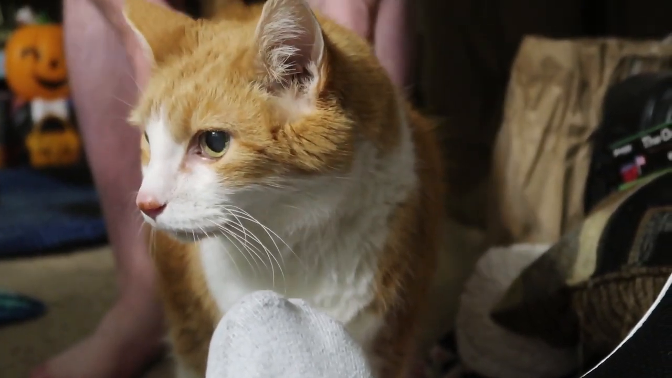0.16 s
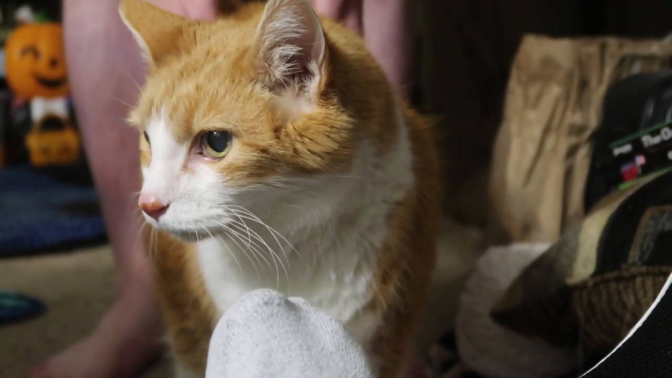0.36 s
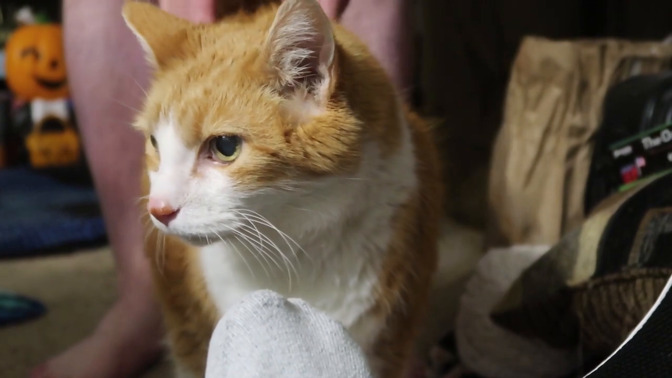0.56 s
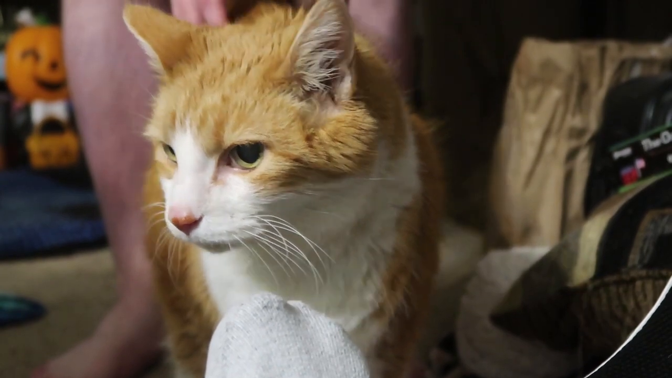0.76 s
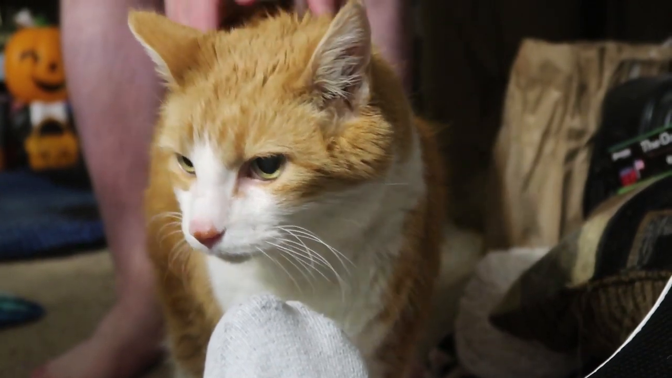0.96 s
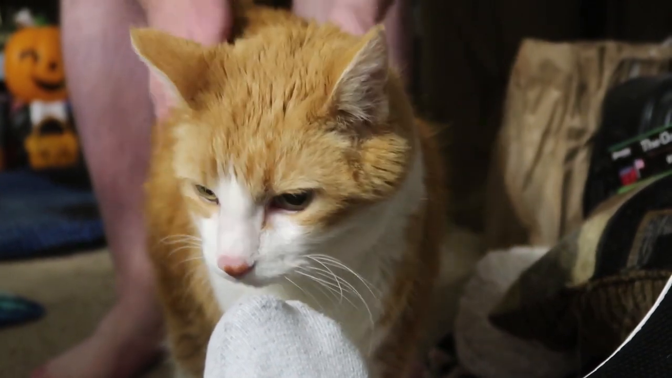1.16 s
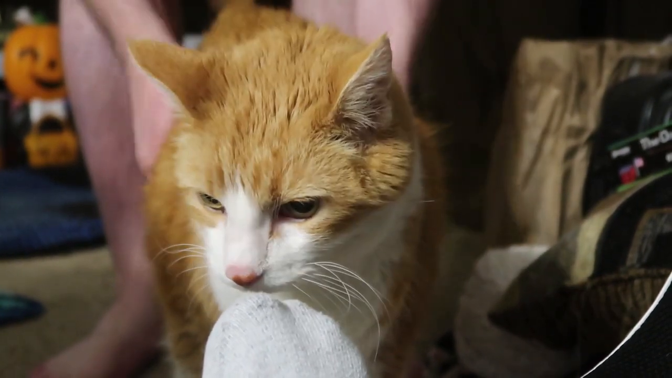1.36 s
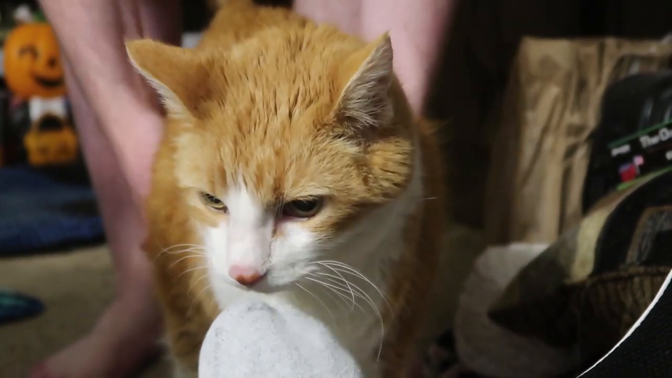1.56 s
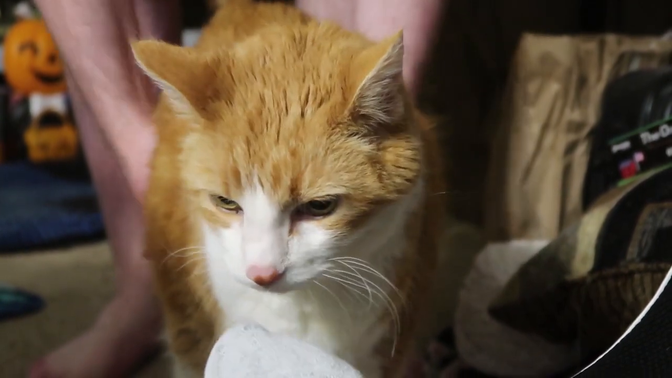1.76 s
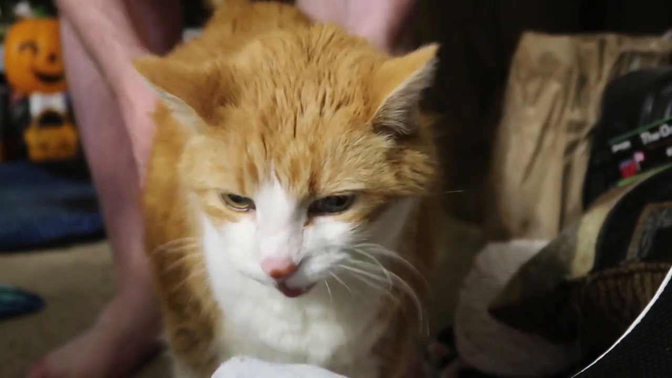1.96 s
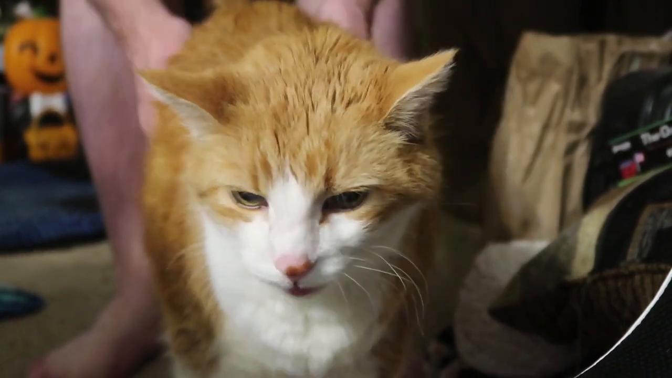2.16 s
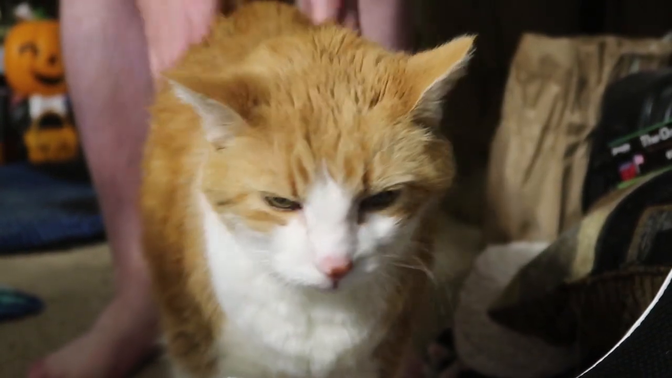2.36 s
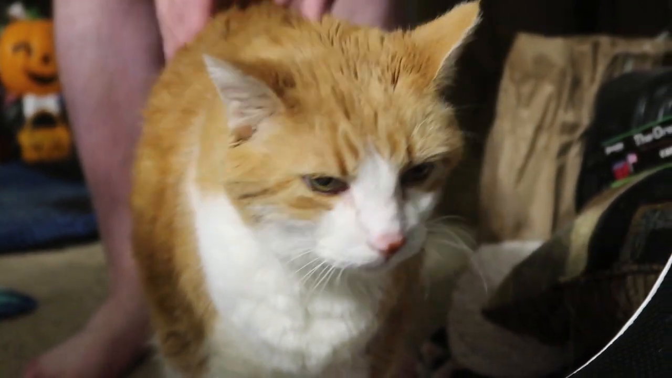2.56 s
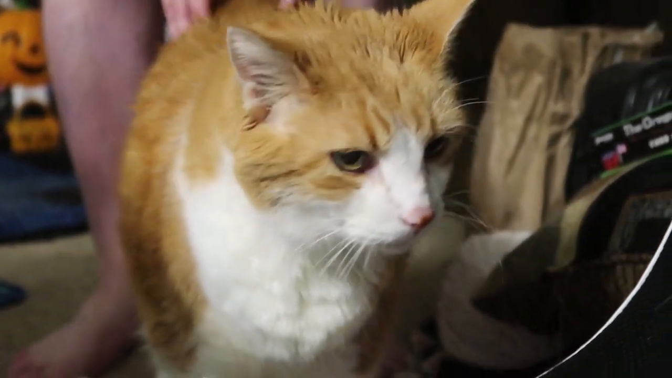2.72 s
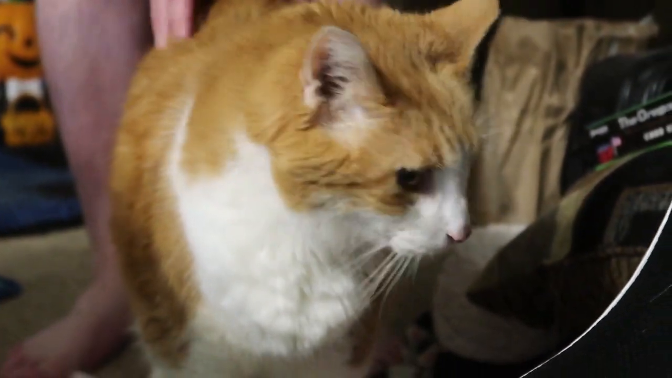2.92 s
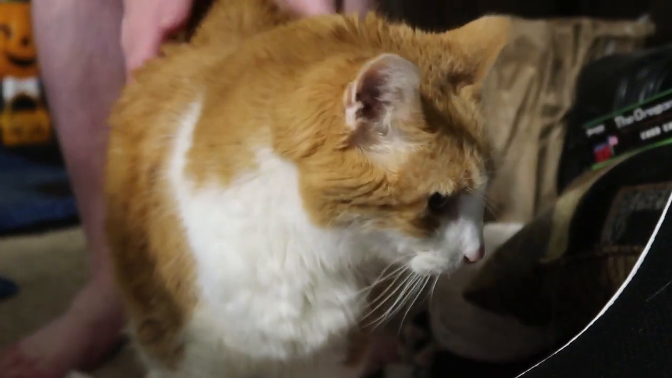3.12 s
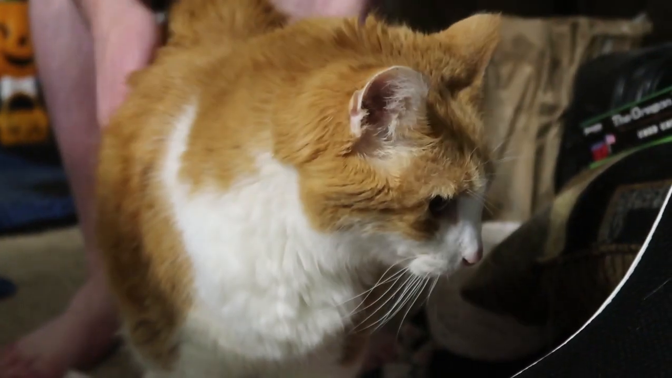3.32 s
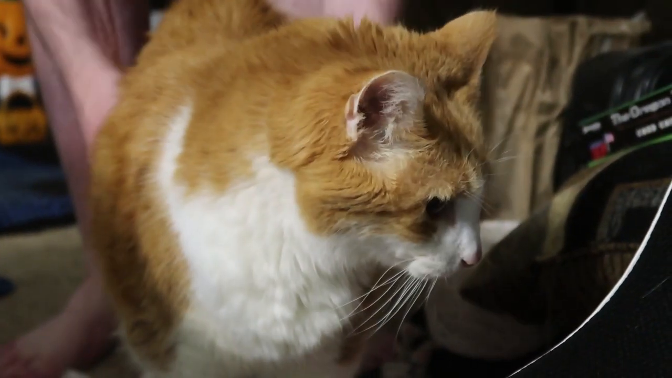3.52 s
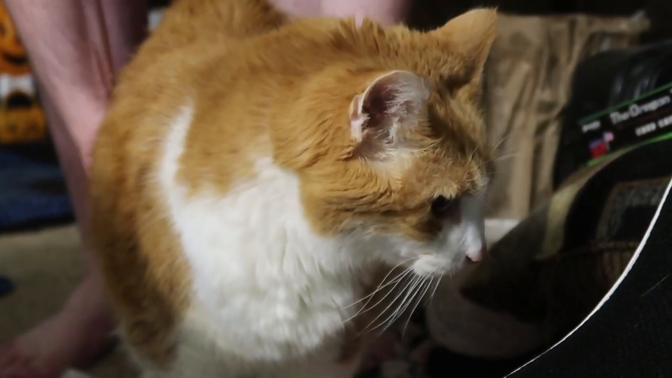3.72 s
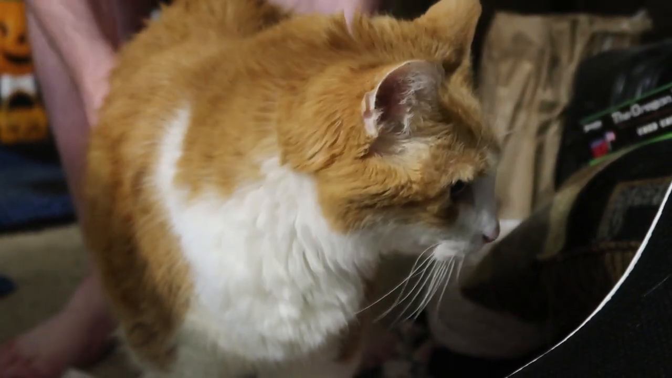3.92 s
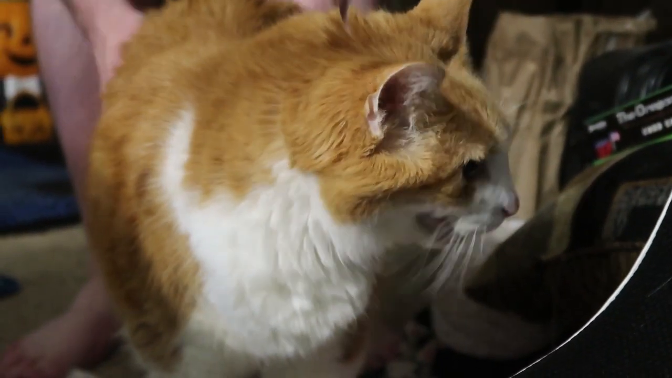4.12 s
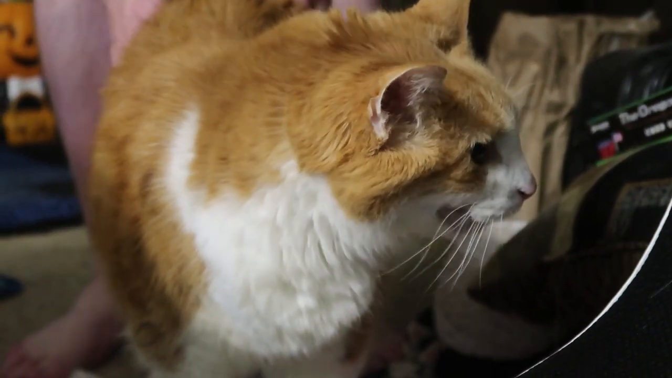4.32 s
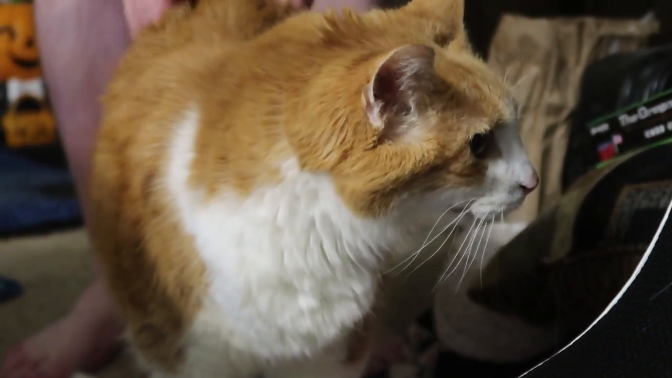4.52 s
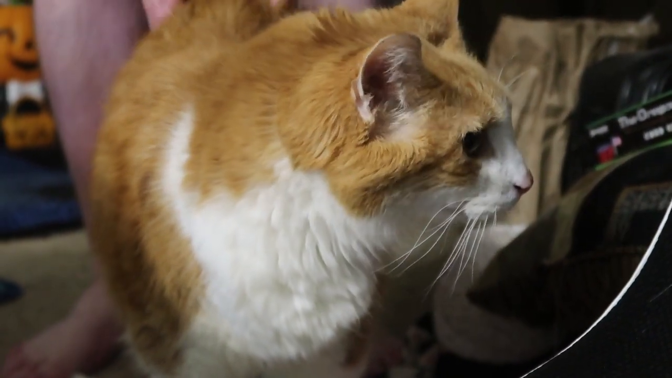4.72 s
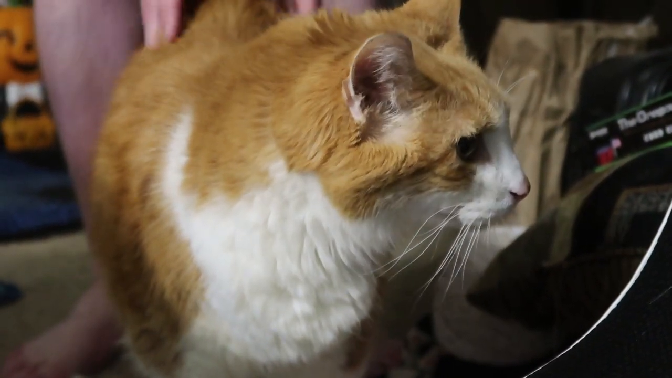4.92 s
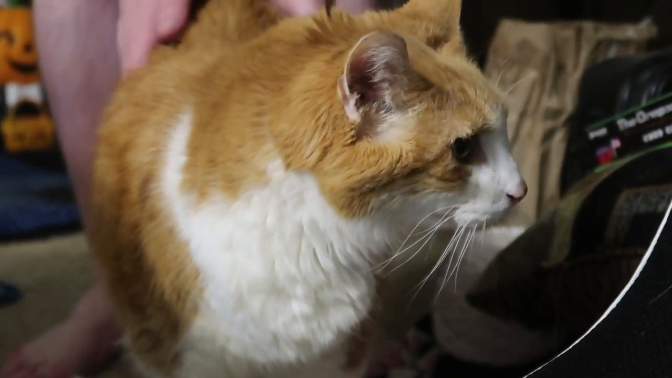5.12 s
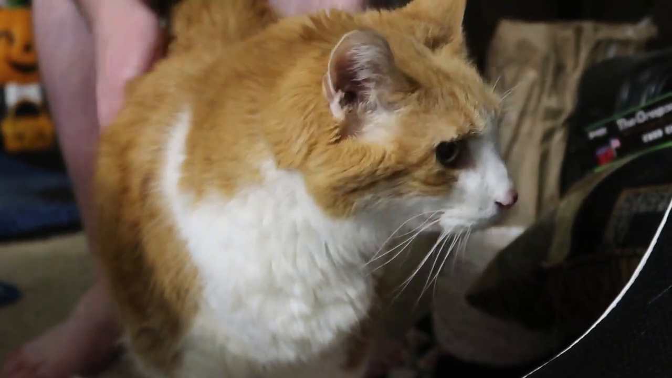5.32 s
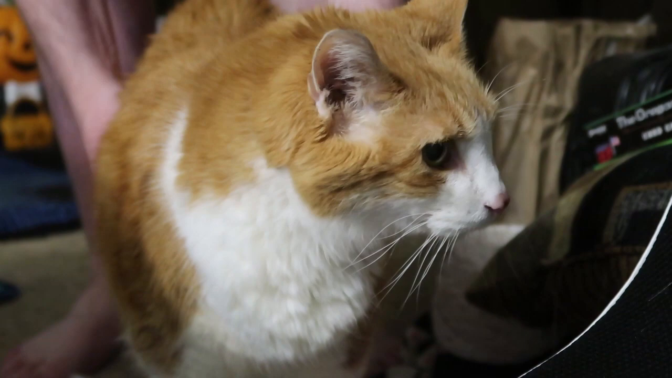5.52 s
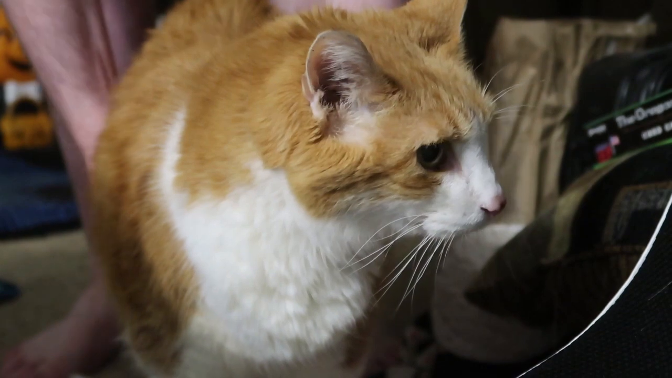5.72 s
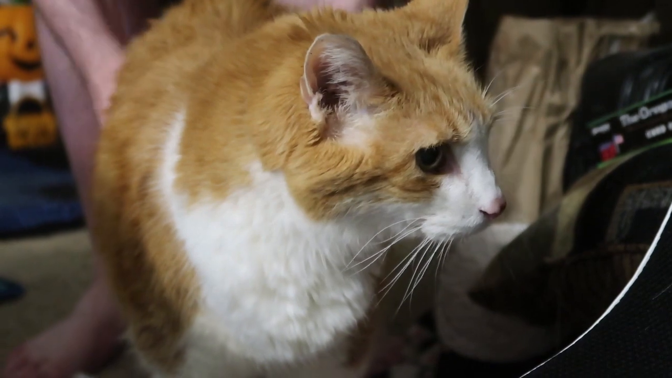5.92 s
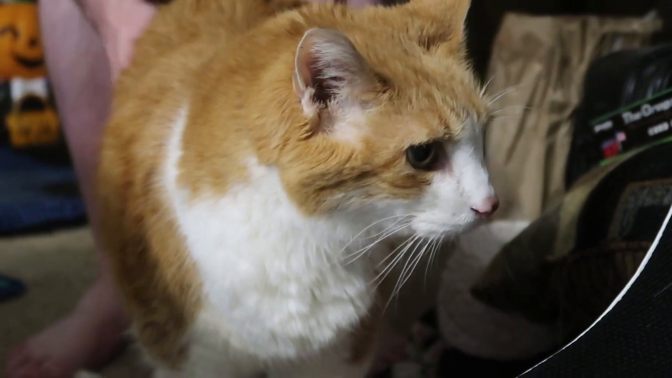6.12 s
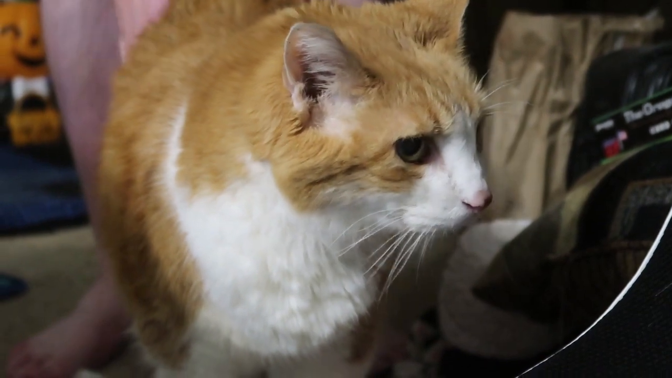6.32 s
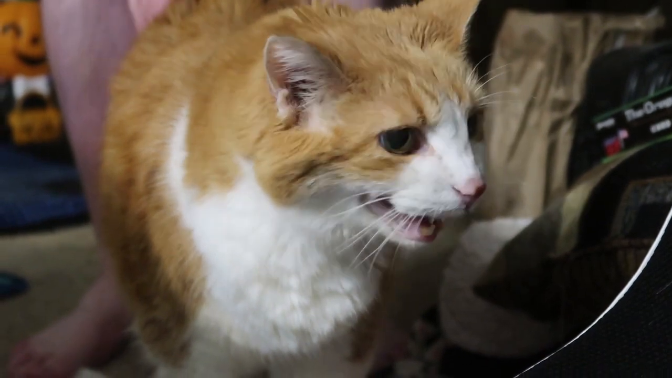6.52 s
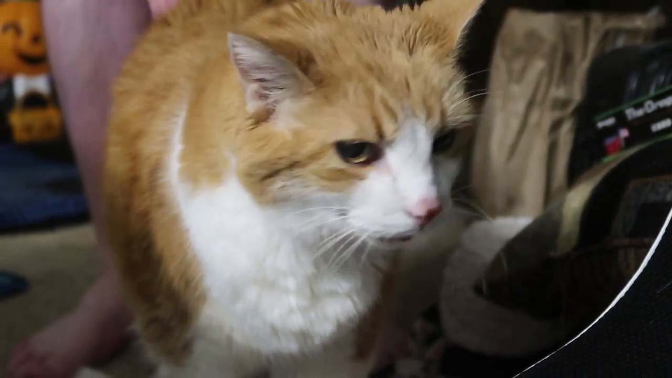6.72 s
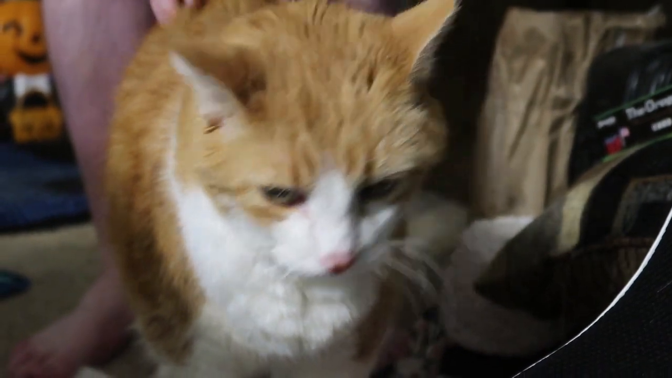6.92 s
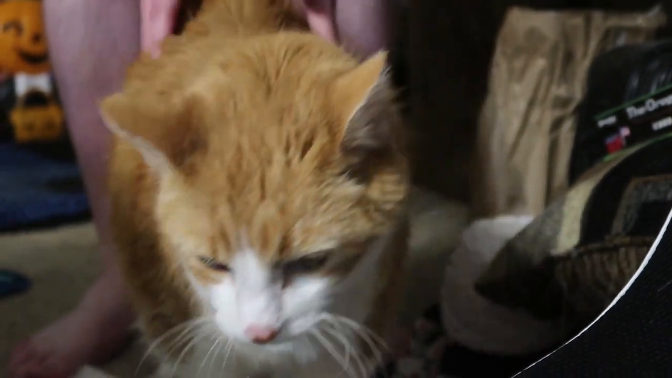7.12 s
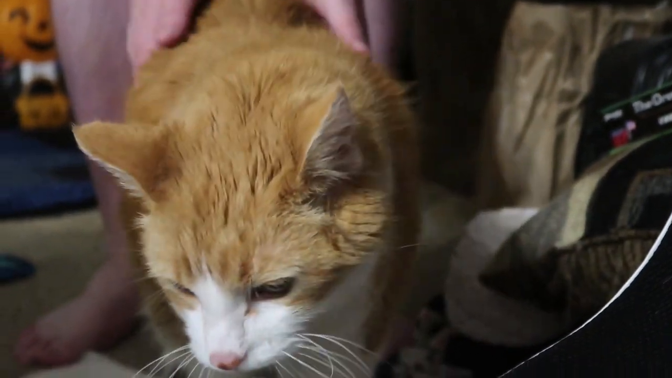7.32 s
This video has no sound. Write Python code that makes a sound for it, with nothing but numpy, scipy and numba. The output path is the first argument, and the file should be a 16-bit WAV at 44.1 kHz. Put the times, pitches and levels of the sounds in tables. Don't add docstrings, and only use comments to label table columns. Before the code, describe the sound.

A house cat meows three times at close range in a quiet carpeted room, each cry opening from a throaty trill, over faint hum and hiss.

```python
import sys
import numpy as np
from scipy import signal
from scipy.fft import rfft, irfft, next_fast_len
from scipy.io import wavfile
from scipy.ndimage import uniform_filter1d, map_coordinates
from numba import njit

SR = 44100
rng = np.random.default_rng(int(sys.argv[2]) if len(sys.argv) > 2 else 0)


def boost_factor(decibels):
    exponent = np.asarray(decibels, float) / 20
    return 10 ** exponent


def unload_wav(signal):
    wavfile.write(
        sys.argv[1],
        SR,
        np.round(np.clip(np.atleast_2d(signal).T, -1, 1) * 32767).astype(np.int16),
    )


N = 329427
TIME = np.arange(N) / SR

# (frequency [Hz], level [dB])
HUM_TONES = [(59.2, -4), (118.4, -2), (178, -11), (360.7, -10.5)]
# (time [s], level [dB], extra level of the lowest tone [dB])
HUM_SWELLS = [(.6, -51.5, 1.5), (1.35, -56, 2.5), (1.85, -58, 6), (2.2, -57, -6), (2.9, -56.5, -8),
              (3.65, -56, 4), (4.05, -61, 5), (4.6, -55, -1.5), (5.2, -56.5, -14), (5.8, -57.5, 3),
              (6.25, -55.5, 1), (7.1, -52.5, -7)]
HUM_SWELL_S, HUM_REST_DB = 0.27, -75
# (frequency [Hz], level per Hz [dB])
AIR_SAME = [(2.4, -53.5), (4.0, -25.5), (16, -20), (27, -11), (47, -7.5), (87, -2), (123, -4.5), (211, -10),
            (351, -10.5), (388, -12.5), (460, -12), (545, -16), (6050, -31), (11500, -43), (13200, -53.5)]
# (frequency [Hz], level per Hz [dB])
AIR_DIFFERENT = [(8.8, -74.5), (15, -38), (43, -16.5), (119, -3), (295, 1), (451, -0.5), (505, -2.5),
                 (566, -6.5), (970, -7), (5960, -22.5), (11100, -32.5), (12100, -39.5), (13200, -14)]
# (time [s], level [dB])
NOSE_WHISTLE = [
    (.35, -76),
    (.5, -71.5),
    (1, -75),
    (1.2, -88),
]

# (time [s], chest peak [dB], pitch [Hz], throat opening [0-1])
TRILL_BURSTS = [(1.927, -40.5, 229, 0.75), (1.937, -38, 151, 0.18), (1.947, -45, 202.7, 0.94),
                (3.985, -49, 130.8, .05), (4.011, -51, 139.2, .15), (4.068, -38.5, 203.4, 0.15),
                (4.096, -35.5, 194.2, 0.2), (4.123, -33.5, 198.6, 0.25), (4.154, -34, 206, 0.4),
                (6.179, -51.5, 142.4, 0.07), (6.221, -37, 155, .1), (6.283, -41.5, 212.1, 0.24),
                (6.311, -33.5, 175.6, 0.02), (6.332, -37.5, 177.8, 0.54), (6.362, -36, 180, 0.57),
                (6.393, -33.5, 152.4, 0.42), (6.42, -35.5, 171, 0.71), (6.445, -39, 192.7, 0.77)]
# (frequency [Hz], width [Hz], level [dB])
SHUT_THROAT_MODES = [(767, 234, 3.5), (1287, 235, -3)]
# (frequency [Hz], width [Hz], level [dB])
SHUT_NOSE_MODES = [(2300, 200, 0), (4000, 440, -5.5), (5730, 260, -13)]
BURST_OVERLAP_S, BURST_LONGEST_S = 0.0062, 0.033
THROAT_SHUT_DB, THROAT_OPENS_DB, NOSE_OPENS_DB = -16.5, 20.5, 26

# (time [s], pitch [Hz], level [dB], mouth resonance [Hz], effort [0-1])
FIRST_MEOW = [
    (1.972, 249.5, -55, 1580, 0.46),
    (2.004, 225.7, -34, 1660, 0.6),
    (2.026, 228.8, -37.5, 2000, 0.98),
    (2.065, 245.1, -35.5, 2100, 0.98),
    (2.18, 243, -34.5, 2057, 1),
    (2.343, 227.1, -32, 1672, 0.55),
    (2.45, 216, -34, 1507, 0.42),
    (2.527, 199.8, -40, 1315, 0.45),
    (2.575, 161, -66, 1340, 0.7),
]
# (time [s], pitch [Hz], level [dB], mouth resonance [Hz], effort [0-1])
SECOND_MEOW = [
    (4.272, 262.5, -40, 2300, 0.67),
    (4.298, 234.1, -34.5, 2320, 0.7),
    (4.342, 235.2, -36, 2300, 0.65),
    (4.384, 223.1, -35, 2190, 0.67),
    (4.486, 218.9, -33.5, 1690, 0.27),
    (4.5, 216.5, -38.5, 1700, 0.43),
    (4.603, 203.7, -39.5, 1483, .2),
    (4.67, 192.9, -41, 1368, .05),
    (4.74, 186.4, -63, 1310, .2),
]
# (time [s], pitch [Hz], level [dB], mouth resonance [Hz], effort [0-1])
THIRD_MEOW = [
    (6.531, 280, -37.5, 2220, 0.62),
    (6.555, 241.2, -35.5, 2300, 0.81),
    (6.59, 232, -35.5, 2310, 0.87),
    (6.63, 235.6, -35.5, 2110, 0.93),
    (6.7, 230.7, -38, 1960, 0.83),
    (6.779, 228.5, -39, 1724, 0.36),
    (6.872, 223.6, -43.5, 1478, 0.052),
    (6.92, 183, -51.5, 1366, .3),
    (6.94, 177, -92, 1390, 0.44),
]
# (time [s], pitch [Hz], level [dB], mouth resonance [Hz], effort [0-1])
LEAD_IN_WHINES = [
    [(4.172, 259, -54.5, 1347, .4), (4.194, 268, -40, 1360, 0.36), (4.213, 259, -45.5, 1400, 0.46),
     (4.228, 266.1, -40, 1840, .6), (4.245, 268, -45.5, 2330, 0.41), (4.264, 267, -47, 2310, 0.76)],
    [(6.462, 226, -58, 1200, 0.63), (6.474, 239, -50, 1350, 0.75), (6.503, 270, -53, 2040, 0.85),
     (6.522, 289, -51.5, 2352, 0.78)],
]
# (lips part [s], mouth over throat [dB], tongue under mouth [dB], teeth [dB],
# trill nasality [dB])
FACE = [
    (2.007, 7.5, -17, -7, -43),
    (4.268, 8.5, -13, -3.5, -21.5),
    (6.525, 5.5, -18.5, -6.5, -18),
]
# (palate [Hz], gums [Hz], teeth [Hz], lips [Hz], teeth loss with shut lips [dB])
UPPER_MODES = [
    (3384, 4320, 5130, 5950, 12),
    (3800, 4550, 5050, 5760, 5),
    (3614, 4415, 5420, 6140, 16),
]
# (level [dB], loss at full effort [dB], gulp as the jaw shuts [dB],
# second harmonic [dB])
CHEST_TONE = [
    (-38.5, 16, 18.5, -43.5),
    (-42, 5.5, 8, -46),
    (-51, -0.5, 12.5, -46.5),
]
HOARSENESS = [
    0.023,
    0.11,
    0.28,
]
# (time [s], half length [s], added roughness [0-1])
VOICE_BREAKS = [(2.02, 0.0086, 0.21), (2.325, 0.029, 0.093), (4.28, 0.017, 0.68), (4.352, 0.014, 0.3),
                (4.453, 0.0031, 0.074), (4.497, 0.005, 0.25), (6.543, 0.013, 0.72), (6.58, 0.0074, 0.38),
                (6.627, 0.0068, 0.4), (6.654, 0.0076, 0.43)]
CLOSING_HZ, CLOSING_SPAN_HZ = 1724, 410
WHINE_SHUT = 0.45
MOUTH_SHUT_DB, TONGUE_SHUT_DB, PALATE_SHUT_DB, GUMS_SHUT_DB, LIPS_SHUT_DB = 11, 22.5, 6, 8.5, 12
MOUTH_SLACK_DB, PALATE_SLACK_DB, TEETH_SLACK_DB, TEETH_WHINE_DB = 3, 37, 11.5, 9.5
TONGUE_RATIO = 1.465
SPREAD_S, SPREAD_RISE, SPREAD_DB, SHUT_SAG = 0.054, 0.059, 8.5, 0.15
GUMS_DB, GUMS_FRESH_DB, MOUTH_FRESH_DB = 0.5, 7.5, 2.5
ROUGH_DB, ROUGH_SPAN_DB, ONSET_ROUGH, ONSET_S = -37.5, 22, .4, .025
DRIFT, ROUGH_DRIFT = .012, .03
CHEST_KNEE_DB, CHEST_FADE, GULP_BEFORE_S, GULP_S = -40, 0.52, 0.019, .015
NOSE_NOTCH_HZ, NOTCH_WIDTH_HZ, NOTCH_DB = 444.7, 12, 19

# (time [s], left over right [dB])
TREBLE_LEAN = [
    (2.3, -1.3),
    (4.4, -1.5),
    (6.7, -1.5),
]
# (delay [s], left level [dB], right level [dB])
NEAR_ECHOES = [(.0019, -29.5, -14.5), (.0027, -31.5, -22), (.0044, -28, -30.5), (.0071, -15, -23.5)]
# (frequency [Hz], time to drop 60 dB [s])
ROOM_DECAY = [(150, 0.33), (1500, 0.51), (7000, 0.11)]


def unit(x):
    return x / np.sqrt(np.mean(x ** 2) + 1e-20)


def steady(x):
    power = uniform_filter1d(uniform_filter1d(x * x, size=600), size=600)
    return x / np.sqrt(np.abs(power) + 1e-12)


def along(points, hz):
    f, v = np.transpose(points)
    return np.interp(np.log(hz + 1), np.log(f + 1), v)


def columns(rows):
    s, *cols = np.transpose(rows)
    return [np.interp(TIME, s, c) for c in cols]


def wobble(rate):
    return map_coordinates(rng.standard_normal(int(N * rate / SR) + 4), [TIME * rate])


def coloured(spectrum):
    m = next_fast_len(N + 8192)
    white = rfft(rng.standard_normal(m))
    gain = boost_factor(along(spectrum, np.fft.rfftfreq(m, 1 / SR)))
    return unit(irfft(white * gain, m)[:N])


def high_pass(x, order, hz):
    return signal.sosfilt(signal.butter(order, hz, "high", fs=SR, output="sos"), x)


@njit
def resonate(x, hz, width, sr):
    y = np.zeros(len(x))
    for i in range(2, len(x)):
        r = np.exp(-np.pi * width[i] / sr)
        turn = 2 * r * np.cos(2 * np.pi * hz[i] / sr)
        y[i] = (1 - r) * (x[i] - x[i - 2]) + turn * y[i - 1] - r * r * y[i - 2]
    return y


def ring(x, hz, width):
    return resonate(x, hz + np.zeros(N), width + np.zeros(N), float(SR))


def hum():
    total = np.zeros(N)
    for k, (hz, db) in enumerate(HUM_TONES):
        swell = boost_factor(HUM_REST_DB)
        for s, swell_db, low_db in HUM_SWELLS:
            peak = boost_factor(swell_db + (k == 0) * low_db)
            swell = swell + peak * np.exp(-((TIME - s) / HUM_SWELL_S) ** 2)
        level = swell * boost_factor(db + 2.0 * wobble(3.12))
        total += level * np.sin(2 * np.pi * hz * TIME + 0.3 * wobble(1.9))
    return total


def air():
    same = boost_factor(-55.0) * coloured(AIR_SAME)
    different = boost_factor(-55.5) * coloured(AIR_DIFFERENT)
    return np.array([same + different, same - different])


def wheeze():
    level, = columns(NOSE_WHISTLE)
    flutter_db = 1.5 * wobble(11.5)
    whistle = ring(ring(rng.standard_normal(N), 2770, 180), 3200, 300)
    return boost_factor(level + flutter_db) * (TIME < 1.3) * unit(whistle)


def meow_now():
    parts = np.transpose(FACE)[0]
    which = np.searchsorted((parts[1:] + parts[:-1]) / 2, TIME)
    return which, TIME - parts[which]


def folds(pitch_hz, rough, jitter, shimmer_db, breath):
    phase = np.cumsum(pitch_hz * (1 + .004 * wobble(40) + jitter * rough * wobble(160))) / SR
    at = np.interp(np.arange(1, int(phase[-1])), phase, np.arange(N))
    size_db = (0.33 + shimmer_db * rough[at.astype(int)]) * rng.standard_normal(4000)[:len(at)]
    taps = at.astype(int)[:, None] + np.arange(-4, 6)
    shape = boost_factor(size_db)[:, None] * np.exp(-.5 * (taps - at[:, None]) ** 2)
    pulses = np.bincount(taps.ravel(), shape.ravel(), N + 8)[:N]
    puff = (1 - phase % 1) ** 2 * rng.standard_normal(N)
    return phase, -pulses + breath * (0.011 + rough) * puff, puff


def shut_cavity(source, modes):
    total = np.zeros(N)
    for k, (hz, width, db) in enumerate(modes):
        total += (-1) ** k * boost_factor(db) * ring(ring(source, hz, width), hz, 3 * width)
    return unit(total)


def trill():
    s, chest_db, hz, opening = np.transpose(TRILL_BURSTS)
    length = (np.diff(s, append=N / SR) + BURST_OVERLAP_S).clip(None, BURST_LONGEST_S)
    throat_db = THROAT_SHUT_DB + THROAT_OPENS_DB * opening
    nasality_db = np.transpose(FACE)[-1][meow_now()[0][(s * SR).astype(int)]]
    nose_db = nasality_db + NOSE_OPENS_DB * (opening - .5)
    pitch = np.interp(TIME, s, hz)
    phase, source, _ = folds(pitch, np.full(N, .8), jitter=0.17, shimmer_db=2.0, breath=.6)
    swell = np.zeros((3, N))
    for k in range(len(s)):
        u = np.arange(int(length[k] * SR)) / (length[k] * SR)
        gains = boost_factor(chest_db[k] + np.array([0, throat_db[k], nose_db[k]]))
        arch = np.sin(np.pi * u ** 0.76) ** [[1.], [.7], [1.5]]
        swell[:, int((s[k] - .003) * SR):][:, :len(u)] += gains[:, None] * arch
    throat = shut_cavity(source, SHUT_THROAT_MODES)
    nose = shut_cavity(source, SHUT_NOSE_MODES)
    chest = np.sin(2 * np.pi * phase) + boost_factor(-9.0) * np.sin(4 * np.pi * phase + 0.75)
    return swell[0] * boost_factor(-4.0) * chest + swell[1] * boost_factor(-4.5) * throat + swell[2] * boost_factor(-4.0) * nose


def chest_tone(phase, pitch, level, press, which):
    chest_db, loss_db, gulp_db, second_db = np.transpose(CHEST_TONE)[:, which]
    ends = np.array([FIRST_MEOW[-1][0], SECOND_MEOW[-1][0], THIRD_MEOW[-1][0]])[which]
    gulp = np.exp(-((TIME - ends + GULP_BEFORE_S) / GULP_S) ** 2)
    chest_db = chest_db - loss_db * press ** 2 + gulp_db * gulp
    second_db = second_db - NOTCH_DB * np.exp(-((2 * pitch - NOSE_NOTCH_HZ) / NOTCH_WIDTH_HZ) ** 2)
    fade_db = CHEST_FADE * (level - CHEST_KNEE_DB).clip(None, 0)
    first = boost_factor(chest_db + 1.0) * np.sin(2 * np.pi * phase - 1.2)
    second = boost_factor(second_db) * np.sin(4 * np.pi * phase - .7)
    return boost_factor(fade_db) * (first + second)


def cries():
    calls = [FIRST_MEOW, LEAD_IN_WHINES[0], SECOND_MEOW, LEAD_IN_WHINES[1], THIRD_MEOW]
    pitch, level, mouth_hz, press = columns(np.concatenate(calls))
    which, since = meow_now()
    level = uniform_filter1d(level, size=200)
    mouth_hz = uniform_filter1d(mouth_hz, size=600)

    closing = ((CLOSING_HZ - mouth_hz) / CLOSING_SPAN_HZ).clip(0, 1)
    whining = since < 0
    shut = np.maximum(closing, WHINE_SHUT * whining)
    slack = 1 - press.clip(0, 1)
    spread = np.exp(-since.clip(0) / SPREAD_S)
    _, mouth_db, tongue_db, top_db, _ = np.transpose(FACE)[:, which]
    palate_hz, gums_hz, teeth_hz, lips_hz, teeth_shut_db = np.transpose(UPPER_MODES)[:, which]
    mouth_db = mouth_db - MOUTH_SHUT_DB * shut - MOUTH_SLACK_DB * slack - MOUTH_FRESH_DB * spread
    palate_db = -PALATE_SLACK_DB * slack - PALATE_SHUT_DB * shut
    top_db = top_db - teeth_shut_db * shut - TEETH_SLACK_DB * slack - TEETH_WHINE_DB * whining
    gliding = [pitch, mouth_db, palate_db, top_db]
    pitch, mouth_db, palate_db, top_db = uniform_filter1d(gliding, size=500, axis=1)
    effort = ((level + mouth_db + 44.0) / 18).clip(0, 1)
    stretch = (1 - SPREAD_RISE * spread) * (1 - SHUT_SAG * closing)
    teeth_hz, lips_hz = teeth_hz * stretch, lips_hz * stretch
    tongue_hz = TONGUE_RATIO * mouth_hz
    tongue_db = tongue_db - TONGUE_SHUT_DB * shut - 4.3 * (0.5 - effort)
    gums_db = GUMS_DB + GUMS_FRESH_DB * spread - GUMS_SHUT_DB * closing
    lips_db = -SPREAD_DB * spread - LIPS_SHUT_DB * closing

    rough = ((ROUGH_DB - level) / ROUGH_SPAN_DB).clip(0, 1)
    rough = rough + ONSET_ROUGH * np.exp(-np.abs(since) / ONSET_S)
    rough = .45 * (rough + np.take(HOARSENESS, which) * press ** 2)
    for s, half, more in VOICE_BREAKS:
        rough = rough + more * np.exp(-((TIME - s) / half) ** 2)
    phase, source, puff = folds(pitch, rough.clip(0, 1), jitter=.06, shimmer_db=1, breath=0.37)
    source = source + 0.1 * high_pass(puff, 2, 3000)

    def mode(hz, width, flutter_db):
        flutter = boost_factor(flutter_db * wobble(35))
        wandering_hz = hz * (1 + (DRIFT + ROUGH_DRIFT * rough) * wobble(45))
        return flutter * steady(ring(ring(source, wandering_hz, width), hz, (2.3 + 6 * effort) * width))

    throat = ring(ring(source, 716, 130 + 200 * effort), 800 + 200 * effort, 260 + 560 * effort)
    throat = steady(high_pass(throat, 2, 560))
    mouth = mode(mouth_hz, 217, 1.0) - boost_factor(tongue_db) * mode(tongue_hz, 240, 3.9)
    palate = mode(palate_hz, 190, 1.3)
    top = boost_factor(2.5) * mode(teeth_hz, 260, 1.4)
    top = top - boost_factor(gums_db) * mode(gums_hz, 330, 1.5) - boost_factor(lips_db) * mode(lips_hz, 240, 0.98)
    voice = boost_factor(mouth_db) * mouth - throat + boost_factor(palate_db + 0.75) * palate + boost_factor(top_db - 11.0) * top
    voice = signal.sosfilt(signal.butter(6, 6500, fs=SR, output="sos"), voice)
    sizzle = steady(ring(ring(source + 0.16 * puff, 10000, 2500), 7900, 3500))
    voice = voice + boost_factor(mouth_db - 51.0) * sizzle

    sounding = sum((TIME > c[0][0]) & (TIME < c[-1][0] + .01) for c in calls)
    gate = uniform_filter1d(sounding.clip(0, 1) * 1., size=60)
    return gate * (chest_tone(phase, pitch, level, press, which) - boost_factor(level) * voice)


def nearby(x):
    bright = high_pass(x, 1, 1500)
    total = np.zeros((2, N))
    for s, left_db, right_db in NEAR_ECHOES:
        total += boost_factor([[left_db], [right_db]]) * np.roll(bright, round(s * SR))
    return total


def room(x):
    hz, t, z = signal.stft(rng.standard_normal((2, SR // 3)), SR, nperseg=256)
    decay = boost_factor(-60 * t / along(ROOM_DECAY, hz)[:, None])
    tail = signal.istft(z * decay, SR, nperseg=256)[1]
    late = np.pad(x, (150, 0))[None]
    return signal.fftconvolve(late, tail / np.linalg.norm(tail[0]), axes=1)[:, :N]


def scene():
    cat = cries() + trill() + wheeze()
    lean_db = np.interp(TIME, *np.transpose(TREBLE_LEAN))
    beam = (boost_factor(lean_db / 2) - 1) * high_pass(cat, 1, 600)
    glance = boost_factor(-9.5) * np.roll(ring(ring(cat, 4700, 3600), 5100, 3500), 14)
    sides = np.array([beam - glance, glance - beam])
    return cat + sides + nearby(cat) + boost_factor(-25.5) * room(cat) + hum() + air()


def top_cut(x):
    return signal.sosfilt(signal.butter(12, 13340, fs=SR, output="sos"), x)


def record(dry):
    mix = dry + .0003
    return top_cut(mix)


dry = scene()
out = record(dry)
unload_wav(out)
```